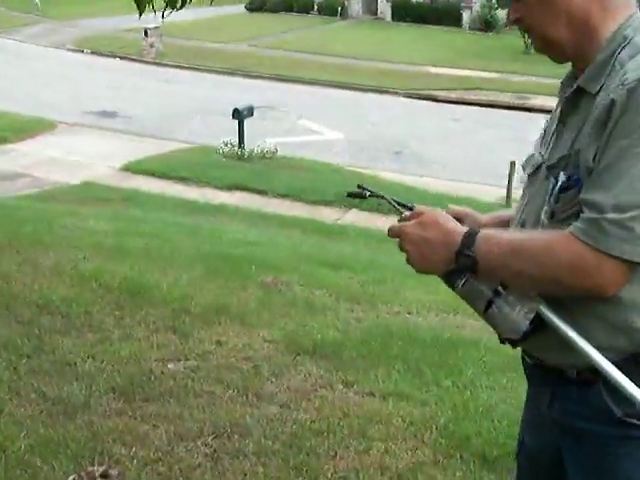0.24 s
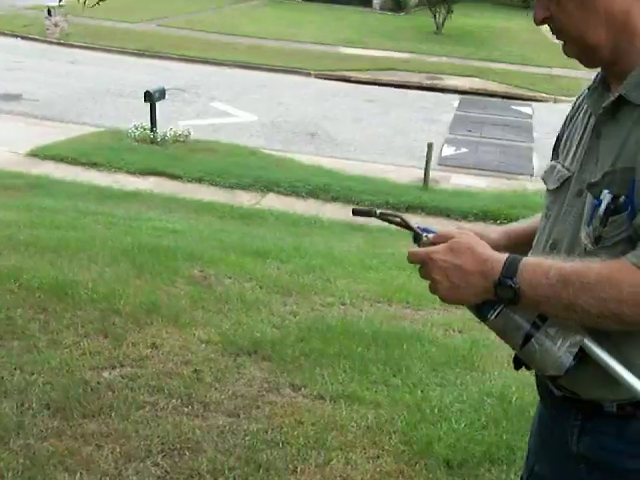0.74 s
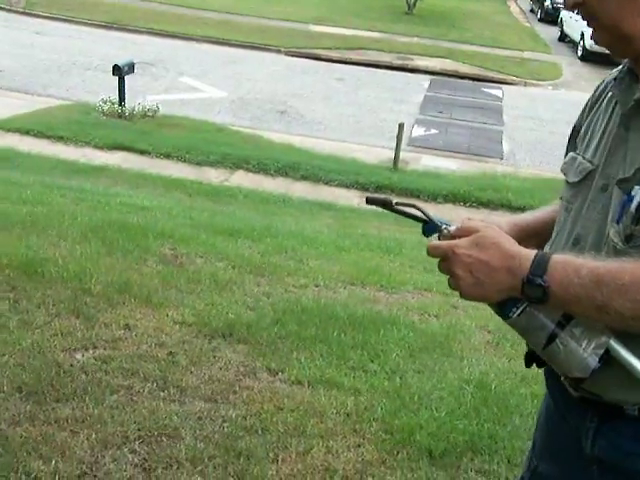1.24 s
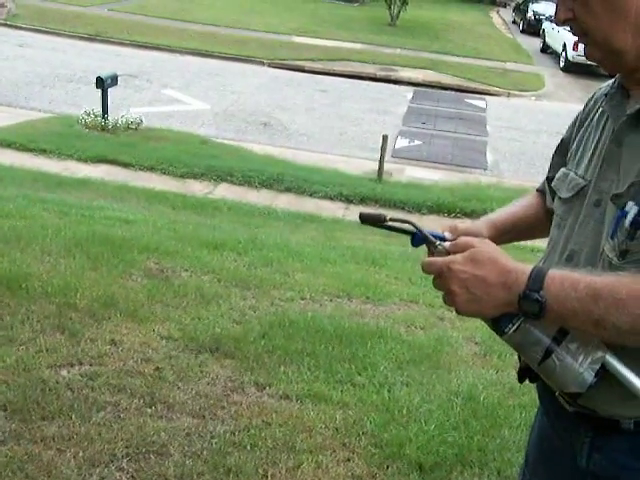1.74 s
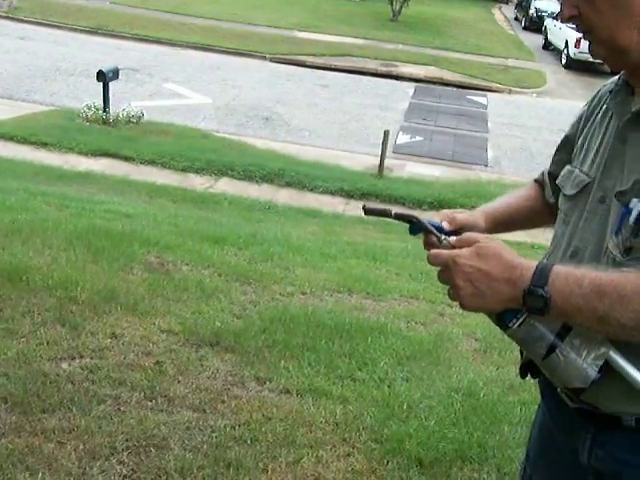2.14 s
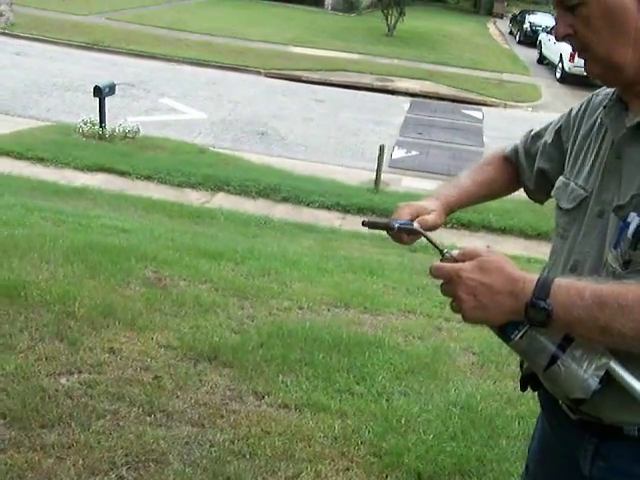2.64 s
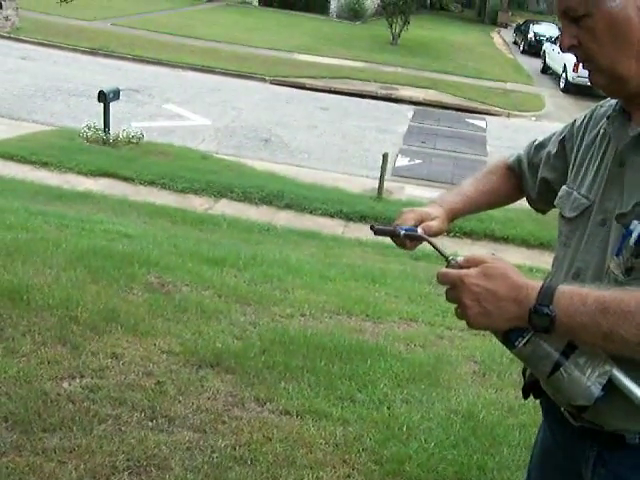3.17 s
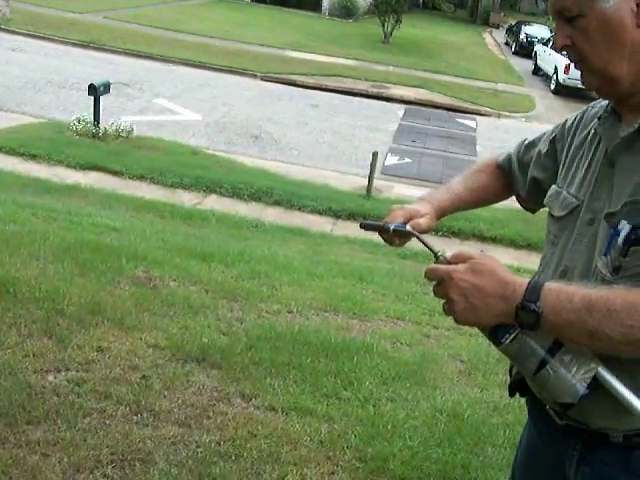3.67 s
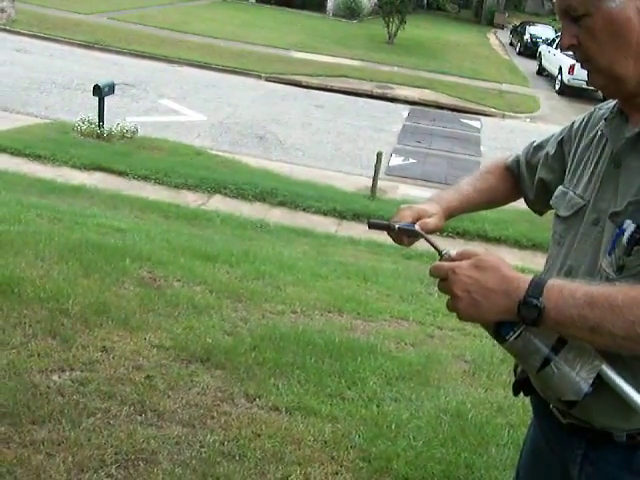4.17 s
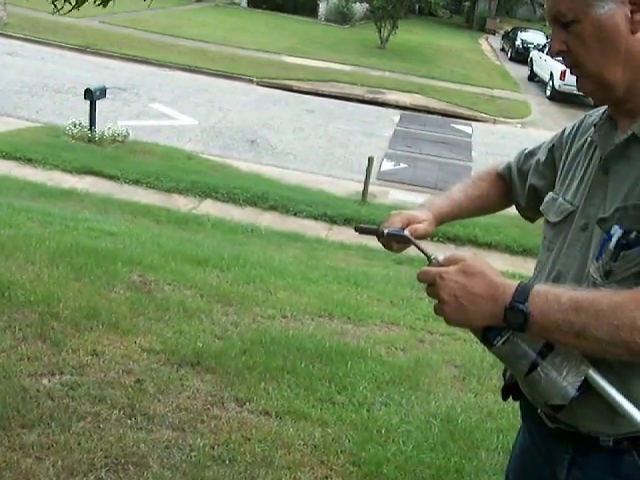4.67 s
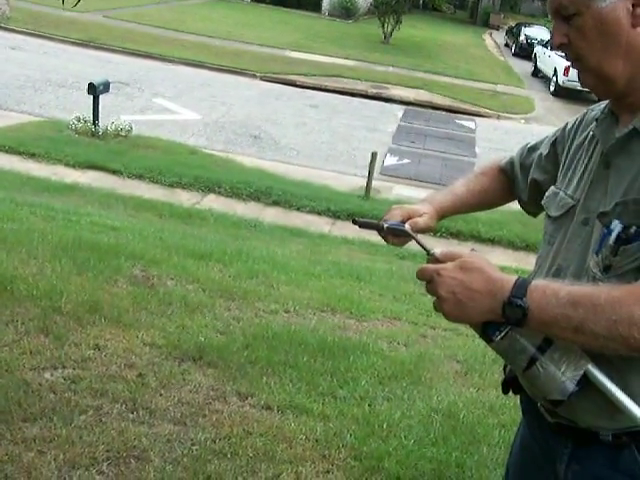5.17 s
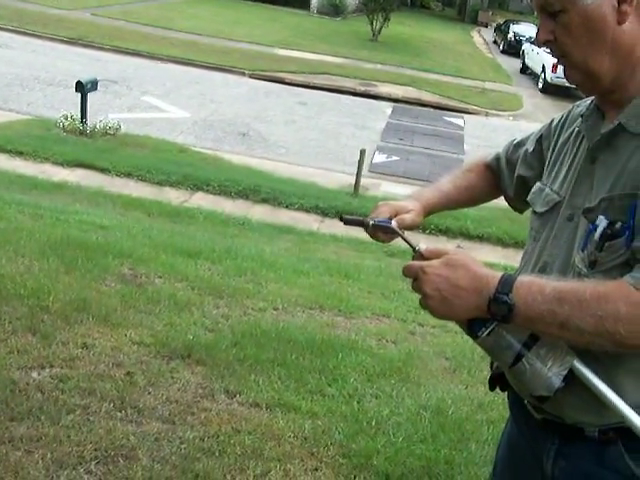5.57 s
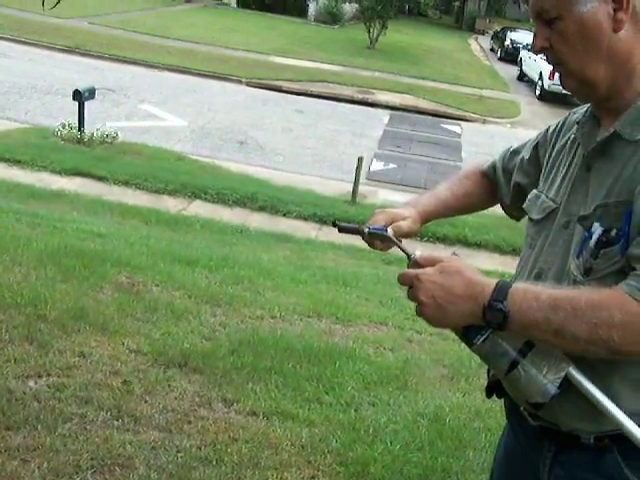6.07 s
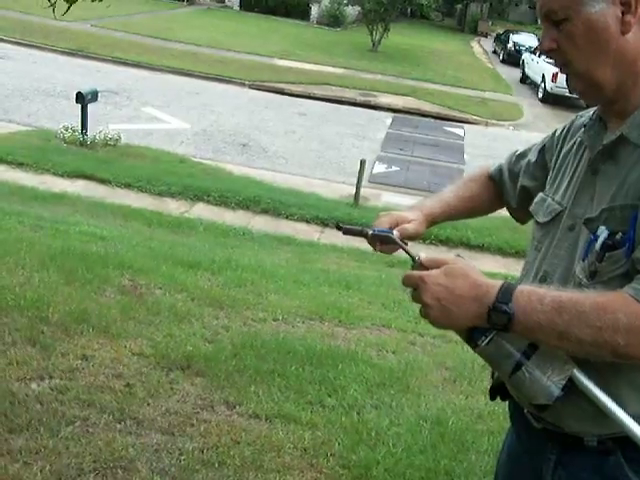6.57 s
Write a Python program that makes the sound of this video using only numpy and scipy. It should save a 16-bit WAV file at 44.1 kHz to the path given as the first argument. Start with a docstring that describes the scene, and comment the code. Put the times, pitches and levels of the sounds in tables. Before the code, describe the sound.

A spark igniter snaps sharply again and again on a lawn, wind buffeting the microphone; near five seconds a steady gas hiss begins.

```python
"""The piezo igniter of a gas torch snaps again and again on a front lawn, as struck modes and bursts of noise.
The trigger rattles back after each snap. A man opens the valve, filtered noise hisses from the nozzle, and he snaps on.
Gust-driven low noise buffets the right microphone port of a small hand-held camera.
Behind lies a quiet street: distant traffic noise, thin hiss and a faint whine of wavering sines.
The camera's gain control ducks at loud peaks; part of the gain returns quickly, the rest very slowly."""
import sys
import numpy as np
from scipy import signal
from scipy.fft import rfft, irfft, next_fast_len
from scipy.io import wavfile
from scipy.ndimage import uniform_filter1d

SR = 44100
rng = np.random.default_rng(int(sys.argv[2]) if len(sys.argv) > 2 else 0)


def pcm_store(signal):
    """Save signal as 16-bit PCM."""
    levels = np.round(np.clip(np.atleast_2d(signal), -1, 1) * 32767)
    wavfile.write(sys.argv[1], SR, levels.astype(np.int16).T)


N = 300762
TIME = np.arange(N) / SR


def undb(db):
    """Decibels to gain."""
    return 10 ** (np.asarray(db) / 20)


def unit(x):
    """Scale to rms 1."""
    return x / np.sqrt(np.mean(x ** 2))


def curve(rows):
    """Join (time [s], value) rows with straight lines."""
    return np.interp(TIME, *np.transpose(rows))


def colour(x, points):
    """Causal filter through (frequency [Hz], level [dB]) points, built from the cepstrum of the log gain."""
    size = next_fast_len(2 * N)
    hz, db = np.transpose(points)
    bins = np.maximum(np.fft.rfftfreq(size, 1 / SR), 1)
    gain_db = np.interp(np.log(bins), np.log(hz), db)
    cepstrum = irfft(np.log(undb(gain_db)), size)
    # Folding the cepstrum onto positive time gives minimum phase.
    cepstrum[1:size // 2] *= 2
    cepstrum[size // 2 + 1:] = 0
    response = np.exp(rfft(cepstrum))
    return irfft(rfft(x, size) * response, size)[..., :N]


def noise(points):
    """Coloured noise of rms 1."""
    return unit(colour(rng.standard_normal(N), points))


def spread(points, apart_db):
    """Coloured noise at two ports: a shared part and a part of opposite sign."""
    shared = noise(points)
    apart = undb(apart_db) * noise(points)
    return unit(shared + apart * np.array([[1], [-1]]))


def walk(rate):
    """Slow chance with a spread near 1, drawn at rate knots per second."""
    knots = rng.standard_normal(1024)
    return 1.2 * np.interp(TIME * rate, np.arange(len(knots)), knots)


def low_pass(x, hz):
    """Steep low-pass without phase shift."""
    return signal.sosfiltfilt(signal.butter(20, hz, fs=SR, output="sos"), x)


def delay(x, seconds):
    """The same signal a little later."""
    return np.interp(TIME - seconds, TIME, x, left=0)


def add(track, s, sound):
    """Mix a short sound into a track at time s."""
    start = int(s * SR)
    part = sound[..., :N - start]
    track[..., start:start + part.shape[-1]] += part


def fade(t60):
    """A quarter second of exponential decay, falling 60 dB in t60 seconds."""
    return undb(-60 * TIME[:SR // 4] / t60)


def bursts(rows, points, shape):
    """One coloured noise burst per (time [s], level [dB]) row; row and shape alone set its energy."""
    track, grain = np.zeros(N), noise(points)
    for s, db in rows:
        burst = np.roll(grain, -int(s * SR))[:len(shape)] * shape
        same_energy = np.sqrt(np.sum(shape ** 2) / np.sum(burst ** 2))
        add(track, s, undb(db) * burst * same_energy)
    return track


# Distant traffic: (time [s], level [dB])
TRAFFIC_LEVEL = [(0, -45.5), (.45, -42), (.8, -45.5), (2.8, -43.5), (3.6, -46), (5.8, -44.5), (6.3, -48),
                 (6.82, -45.5)]
# Traffic spectrum: (frequency [Hz], relative level [dB])
STREET_SPECTRUM = [(25, 6.5), (70, 19), (115, 17), (170, 9.5), (300, 4.5), (750, 2.5), (1100, -0.5),
                   (1600, -16), (3000, -22.5), (8300, -20.5)]
# Thin even hiss: (frequency [Hz], relative level [dB])
AIR_SPECTRUM = [(500, 5), (1500, 10), (3000, -0.5), (5000, 4), (6500, -1), (8300, -6.5)]
# Faint whine: (mean frequency [Hz], relative level [dB])
WHINE_TONES = [(2756, -71), (3865, -75), (4102, -74), (4339, -68), (4452, -72), (4980, -70), (5098, -71),
               (6971, -74)]


def street(swell_db=0.03, air_db=-52, whine_db=-2, waver_hz=6, whine_wander_db=2):
    """Distant traffic noise rises and falls a little under an even hiss and faint sines of wavering pitch."""
    traffic_db = curve(TRAFFIC_LEVEL) + swell_db * walk(9.1)
    traffic = spread(STREET_SPECTRUM, apart_db=-33.5) * undb(traffic_db)
    air = spread(AIR_SPECTRUM, apart_db=0.5) * undb(air_db)
    whine = np.zeros(N)
    for hz, db in WHINE_TONES:
        level = undb(db + whine_wander_db * walk(1.8))
        phase = 2 * np.pi * np.cumsum(hz + waver_hz * walk(30)) / SR
        whine += level * np.sqrt(2) * np.sin(phase)
    return traffic + air + undb(whine_db) * whine


# Gusts at the microphone: (peak time [s], relative level [dB], time to swell or die away [s])
GUST_PEAKS = [(0.22, -26.5, 0.073), (1.33, -36, 0.029), (1.72, -32, 0.051), (1.93, -26.5, 0.032),
              (2.039, -24, 0.06), (2.36, -32.5, 0.37), (2.758, -22.5, 0.12), (2.99, -29.5, 0.023),
              (3.83, -35, 0.038), (4.614, -19.5, 0.031), (4.901, -17.5, 0.074), (5.17, -26, 0.11),
              (5.5, -28.5, 0.067), (6.48, -34, 0.12), (6.67, -26, 0.015), (6.81, -24.5, 0.037)]


def wind_strength(skirt=1.7, breeze_db=-45, wander_db=3, wander_rate=6.9):
    """Wind level in dB: bell-shaped gusts add their power to a wandering breeze."""
    breeze = undb(breeze_db + wander_db * walk(wander_rate))
    power = breeze ** 2
    for s, db, swell_s in GUST_PEAKS:
        gust = undb(db) * (1 + ((TIME - s) / swell_s) ** 2 / skirt) ** -skirt
        power = power + gust ** 2
    return 10 * np.log10(power)


# Wind spectra, each (frequency [Hz], relative level [dB]): low thumps of eddies
BUFFET_SPECTRUM = [(15, -2), (35, 2.5), (65, 3.5), (120, -6.5), (200, -18), (350, -31), (700, -55.5),
                   (2000, -72.5)]
# brighter flapping in hard gusts
FLAP_SPECTRUM = [(40, -5.5), (110, 5.5), (200, -2.5), (330, -15.5), (600, -44), (2000, -57.5)]
# softer rush above
RUSH_SPECTRUM = [(100, 16), (300, -0.5), (500, -7), (800, 5), (1200, -11.5), (2000, -4), (5000, -31.5)]
# slow pressure swaying below
SWAY_SPECTRUM = [(12, -4), (28, 3.5), (45, 0), (80, -35.5), (300, -61)]


def wind(right_db=6, left_db=-12, eddy_db=3.0, eddy_rate=45, rush_db=-44, rush_growth=0.15,
         gust_db=-34, hard_db=-10, hard_growth=1.3, sway_db=-32):
    """Eddies thump on the right port, brighter in hard gusts, with rush and sway; the left is sheltered."""
    gust = wind_strength() - gust_db  # dB above a reference wind
    eddies = eddy_db * walk(eddy_rate)
    thumps = noise(BUFFET_SPECTRUM) * undb(gust_db + gust + eddies)
    flaps = noise(FLAP_SPECTRUM) * undb(gust_db + hard_db + hard_growth * gust + eddies)
    rush = noise(RUSH_SPECTRUM) * undb(rush_db + rush_growth * gust)
    sway = noise(SWAY_SPECTRUM) * undb(sway_db + 0.27 * gust + 2.6 * walk(5.3))
    left = noise(BUFFET_SPECTRUM) * undb(gust_db + left_db + 0.22 * gust)
    right = undb(right_db) * (thumps + flaps) + rush + sway
    return np.array([left, right])


def valve(opens_s=4.947, crack_s=0.031, turn_s=0.67, leak_db=-16.5):
    """Gas flow: none, a sudden small leak, then a smooth rise to full flow as the knob turns."""
    since = TIME - opens_s
    leak = undb(leak_db) * np.clip(since / crack_s, 0, 1)
    turned = np.sin(np.pi / 2 * np.clip(since / turn_s, 0, 1)) ** 2
    return leak + (1 - leak) * turned


# Gas jet in the burner tube: (frequency [Hz], relative level [dB])
JET_SPECTRUM = [(1000, -21), (2000, -21.5), (3000, -19.5), (3700, -9.5), (4000, -3), (4500, -2.5),
                (5000, -8.5), (5400, -7), (5750, 3.5), (6400, 2), (6950, -6.5), (7500, -12), (8300, -15)]


def gas(hiss_db=-31.5, flutter_db=1.3, flutter_rate=25):
    """The jet hisses in the resonances of the burner tube and flutters slightly."""
    level = undb(hiss_db + flutter_db * walk(flutter_rate))
    return spread(JET_SPECTRUM, apart_db=-7.0) * valve() * level


# Trigger reaching its stop as it is let go or gripped again: (time [s], relative level [dB])
TRIGGER_RETURNS = [(0.369, -27.5), (0.7694, -29), (1.2458, -31.5), (2.2068, -29), (2.2233, -32.5),
                   (2.8635, -29.5), (3.3495, -31), (3.9, -34.5), (4.3091, -39), (4.3282, -35.5),
                   (4.9842, -36.5), (5.039, -39.5), (5.0644, -32.5), (5.815, -26), (6.1829, -27.5),
                   (6.5493, -30.5)]


def trigger_knocks(catch_s=0.04, catch_db=-13, bounce_s=.004, bounce_db=-10.5):
    """The trigger catches faintly on its way back, meets the stop and bounces once."""
    chance = rng.uniform(.5, 1.5, (len(TRIGGER_RETURNS), 2))
    knocks = []
    for (s, db), (early, late) in zip(TRIGGER_RETURNS, chance):
        knocks.append((s - catch_s * early, db + catch_db))
        knocks.append((s, db))
        knocks.append((s + bounce_s * late, db + bounce_db))
    return knocks


def fidgets(count=8, until_s=2.7, level_db=-37, scatter_db=0.5):
    """Faint ticks at chance moments while the grip shifts."""
    return [(until_s * when, level_db + scatter_db * (2 * force - 1))
            for when, force in rng.random((count, 2))]


# Light metal ticks of the torch in the hand: (time [s], relative level [dB])
HAND_TICKS = [(0.9091, -12), (0.933, -25.5), (1.4746, -19.5), (1.536, -30), (2.6089, -26.5),
              (3.2651, -27.5)]
# Trigger knock spectrum: (frequency [Hz], relative level [dB])
TRIGGER_SPECTRUM = [(500, -20), (1300, 0), (2000, 0.5), (3000, 1.5), (4300, 1.5), (5200, 5), (6200, -4),
                    (8000, -12.5)]
# Metal tick spectrum: (frequency [Hz], relative level [dB])
TICK_SPECTRUM = [(1500, -43), (3200, -23), (4300, -6), (5000, 22), (6200, 8.5), (8000, -9.5)]


def handling(return_db=-2, scrape_db=-17, scrape_t60=0.076, tick_db=-7, ping_db=-7, ping_hz=5000,
             ring_db=-25, ring_t60=0.14):
    """The trigger knocks and scrapes back to its stop; metal parts tick, ping and ring briefly."""
    stop = fade(.012) + undb(scrape_db) * fade(scrape_t60)
    tap = fade(.009) * (1 - fade(.003))
    trigger = bursts(trigger_knocks(), TRIGGER_SPECTRUM, stop)
    touches = HAND_TICKS + fidgets()
    ticks = bursts(touches, TICK_SPECTRUM, tap + undb(ring_db) * fade(ring_t60))
    ping = tap * np.sin(2 * np.pi * ping_hz * TIME[:len(tap)])
    pings = np.zeros(N)
    for s, db in touches:
        add(pings, s, undb(db) * ping)
    return undb(return_db) * trigger + undb(tick_db) * ticks + undb(ping_db) * pings


# Igniter snaps: (time [s], ring [dB], crack [dB], housing knock [dB]), all relative levels
IGNITER_SNAPS = [(0.1309, -2.5, -2, -3), (0.5395, 1, -3, 3), (1.0021, -2, 6, -14.5), (1.4274, 1, -5, -2),
                 (2.472, -1, -0.5, 0), (3.1, 1.5, 6.5, -22), (3.5104, 3.5, 0.5, -25), (4.0608, 3, 1, -20),
                 (4.4902, 2, 2.5, -9), (5.221, 3.5, 5.5, -18), (5.9623, 3.5, 3.5, -1.5),
                 (6.3389, 0.5, 8, -25), (6.7013, 3.5, 11.5, -11)]
# Modes of the struck igniter: (frequency [Hz], relative level [dB], 60 dB decay time [s])
IGNITER_MODES = [(1340, -22.5, 0.015), (3014, -11, 0.012), (3393, -14, 0.0072), (4010, -25, 0.011),
                 (4570, -53.5, 0.0039), (6230, 2, 0.0069), (7650, -1, 0.0047), (9010, -15, 0.021)]
# Snap spectra, each (frequency [Hz], relative level [dB]): crack
CRACK_SPECTRUM = [(200, -22), (700, -39.5), (2000, -30.5), (2600, -16.5), (2950, 2.5), (3400, 1.5),
                  (4200, -6.5), (5200, -1.5), (6200, -8), (8300, 0)]
# housing knock
KNOCK_SPECTRUM = [(200, -10.5), (700, -23.5), (1150, -18), (1400, -15.5), (2100, -6), (2600, -8.5),
                  (4000, -6), (8000, -42)]
# spring shiver
SPRING_SPECTRUM = [(1400, -19), (2200, -12.5), (2750, -14), (3100, -1.5), (3500, -14), (4200, -14),
                   (4800, -5.5), (6200, 4), (7000, -1), (7500, -4), (8300, -11.5)]


def igniter(ring_db=-6, crack_db=-15, knock_db=-19, contact_s=0.0024, rise_s=0.00032,
            spring_db=-27, spring_t60=0.14, ground_s=.0052, ground_db=-17):
    """The hammer chatters on the crystal and rings the housing; its spring shivers; the ground echoes."""
    t = TIME[:SR // 4]
    rise = 1 - np.exp(-(t / rise_s) ** 2)
    contact = rise * np.exp(-(t / contact_s) ** 4)
    ring, shiver = np.zeros(N), np.zeros(N)
    for s, db, _, _ in IGNITER_SNAPS:
        # Every mode lands slightly off pitch at each snap.
        detune = 1 + 0.011 * rng.standard_normal(len(IGNITER_MODES))
        modes = np.zeros(len(t))
        for (hz, mode_db, t60), shift in zip(IGNITER_MODES, detune):
            modes += undb(mode_db) * fade(t60) * np.sin(2 * np.pi * hz * shift * t)
        add(ring, s, undb(db + ring_db) * rise * modes)
        add(shiver, s, undb(db + spring_db) * rise * fade(spring_t60))
    cracks = [(s, db) for s, _, db, _ in IGNITER_SNAPS]
    knocks = [(s, db) for s, _, _, db in IGNITER_SNAPS]
    crack = undb(crack_db) * bursts(cracks, CRACK_SPECTRUM, contact)
    knock = undb(knock_db) * bursts(knocks, KNOCK_SPECTRUM, contact)
    snap = ring + crack + knock
    echo = undb(ground_db) * delay(snap, ground_s)
    return snap + echo + shiver * spread(SPRING_SPECTRUM, apart_db=3.5)


def scene():
    """Everything as it arrives at the two microphone ports."""
    return street() + wind() + gas() + handling() + igniter()


def hold(x, release_s):
    """Peak follower: jumps up with x and sinks back exponentially."""
    sink = TIME / release_s
    return np.exp(np.maximum.accumulate(np.log(x + 1e-9) + sink) - sink)


def gain_control(x, rest_db=14, threshold_db=-21, quick_share=0.31, quick_s=0.27,
                 slow_share=0.56, slow_s=60, lag_s=0.0037):
    """Loud peaks pull the gain down; part of it returns quickly, the rest very slowly."""
    power = uniform_filter1d(np.max(x ** 2, axis=0), size=176)  # about 4 ms
    level_db = 10 * np.log10(np.abs(power) + 1e-12)
    excess = np.maximum(level_db - threshold_db, 0)
    cut = quick_share * hold(excess, quick_s) + slow_share * hold(excess, slow_s)
    return x * undb(rest_db - delay(cut, lag_s))


# Cavity resonances of the microphone ports: (frequency [Hz], left gain [dB], right gain [dB])
PORT_RESONANCES = [(910, 0, -1.5), (1914, -4.5, -4.5), (3115, 3.5, 7.5), (3940, -2, 6), (5070, 6.5, 9.5),
                   (5280, 5, 5.5), (6076, 16, 1), (6234, 13.5, -15.5), (6660, 11, 2), (6700, 10, 1.5),
                   (7660, 4.5, -4.5), (8940, -3, 2)]


def record(dry, ceiling=1.0, band_hz=8400, top_hz=18000):
    """Port resonances, gain control, an overloaded preamplifier, a narrow band, and clipping at full scale."""
    left = colour(dry[0], [(hz, db) for hz, db, _ in PORT_RESONANCES])
    right = colour(dry[1], [(hz, db) for hz, _, db in PORT_RESONANCES])
    levelled = gain_control(np.array([left, right]))
    overloaded = np.clip(levelled, -ceiling, ceiling)
    narrow = low_pass(overloaded, band_hz)
    return low_pass(np.clip(narrow, -1, 1), top_hz)


dry = scene()
out = record(dry)
pcm_store(out)
```